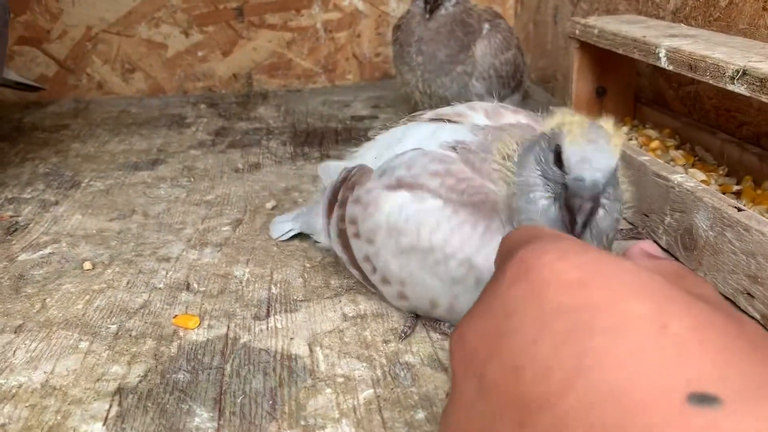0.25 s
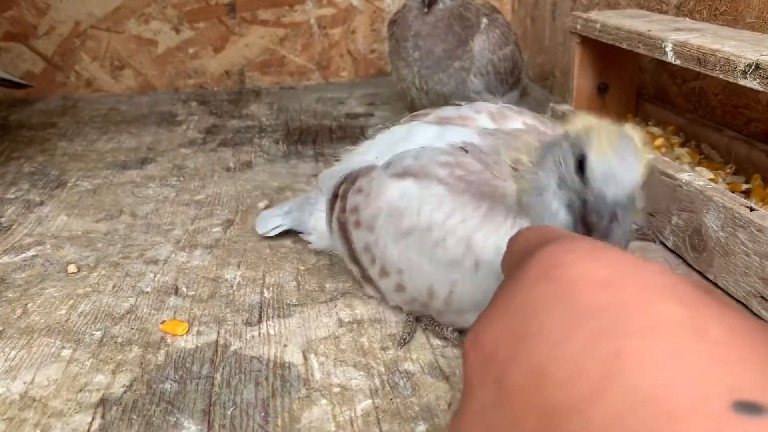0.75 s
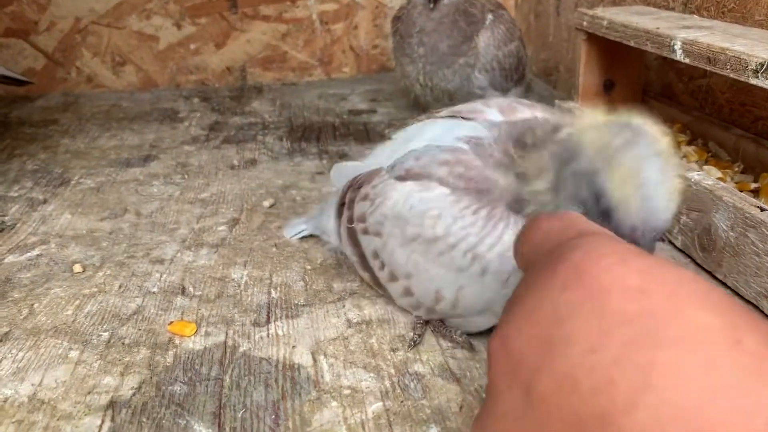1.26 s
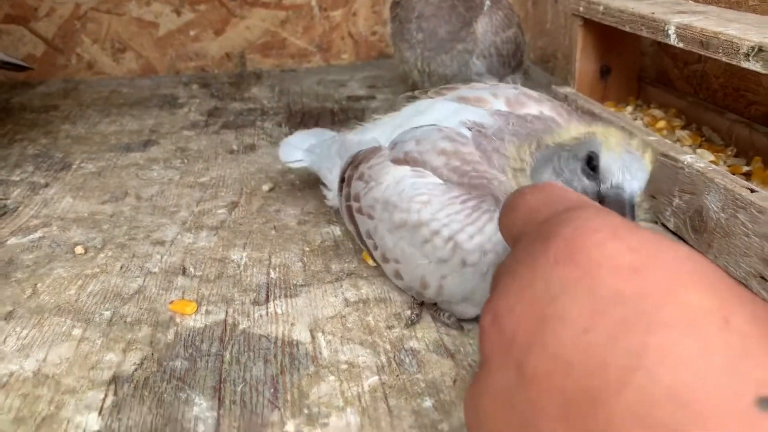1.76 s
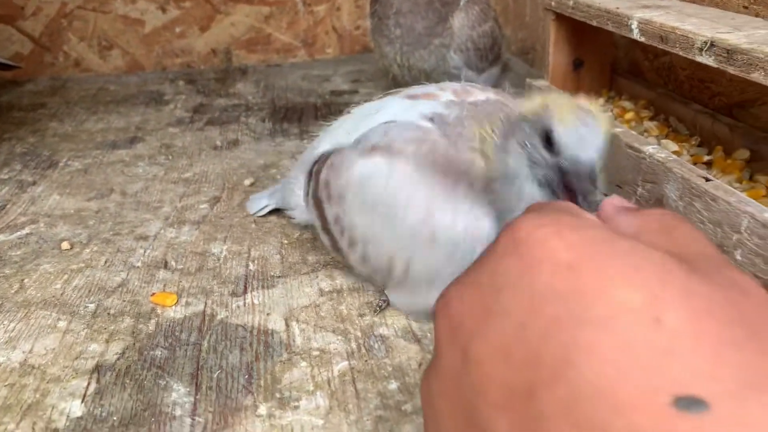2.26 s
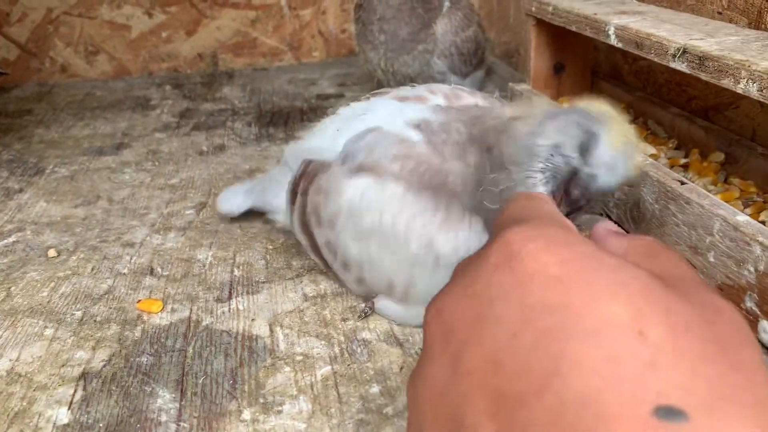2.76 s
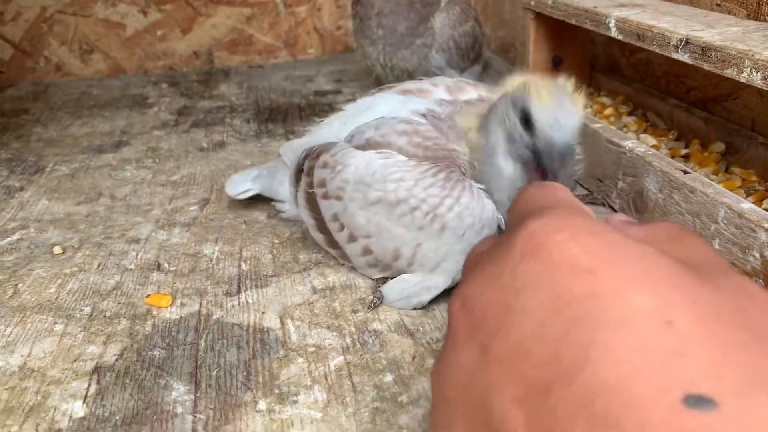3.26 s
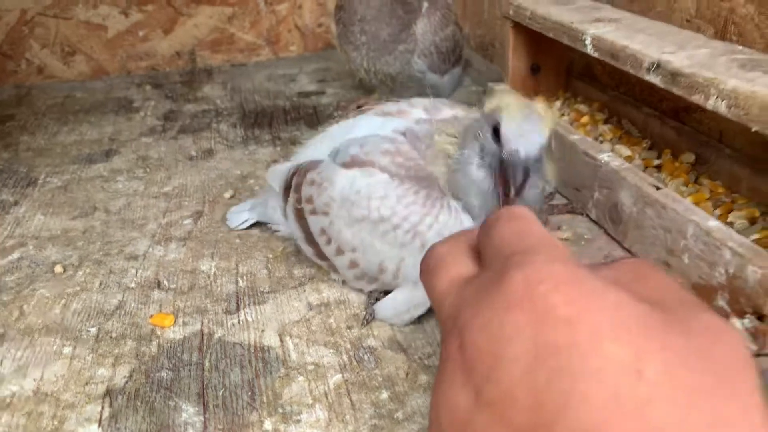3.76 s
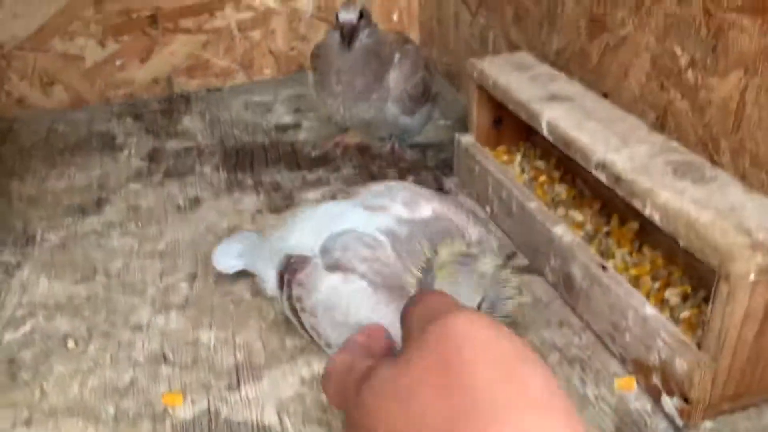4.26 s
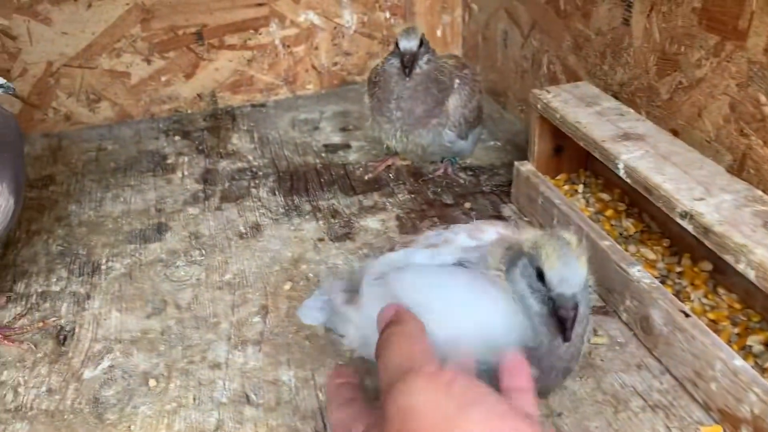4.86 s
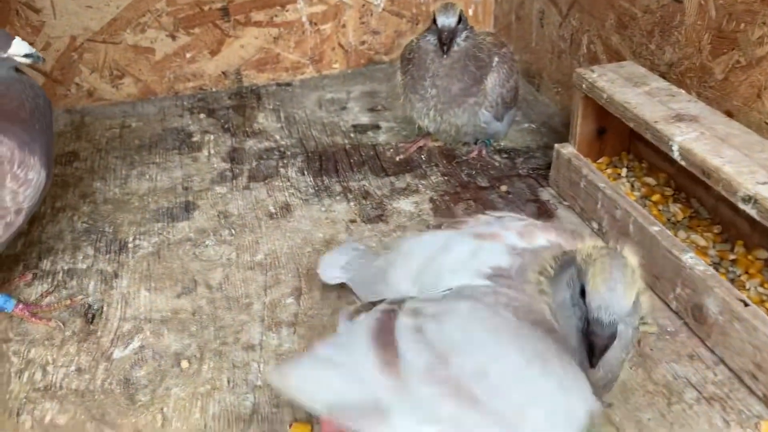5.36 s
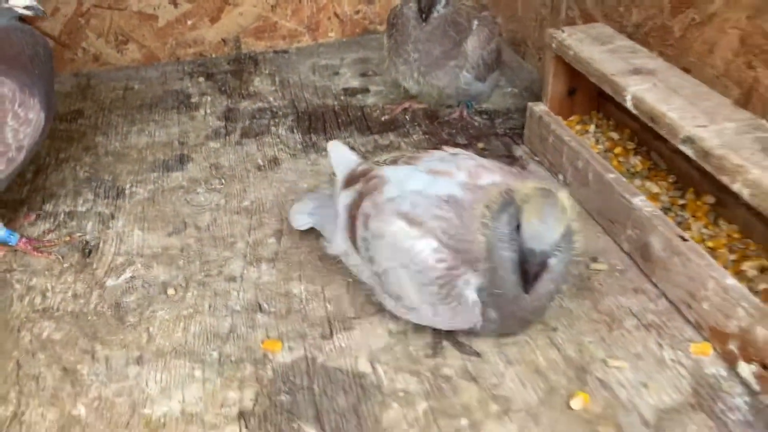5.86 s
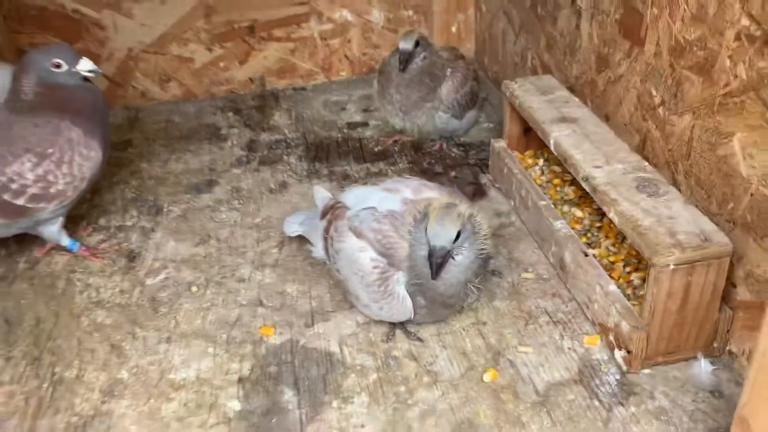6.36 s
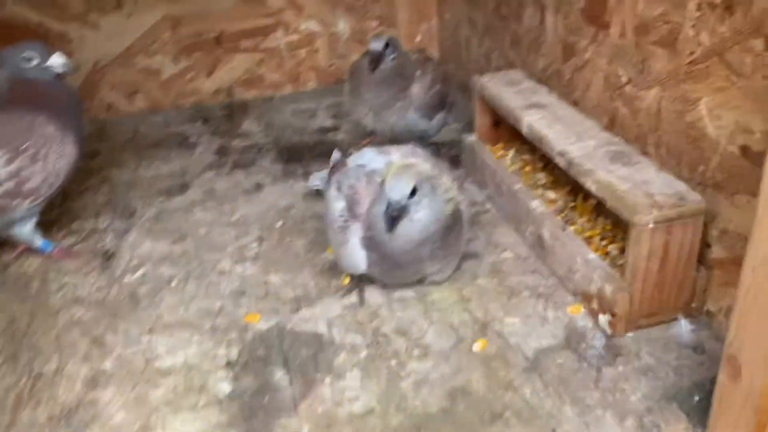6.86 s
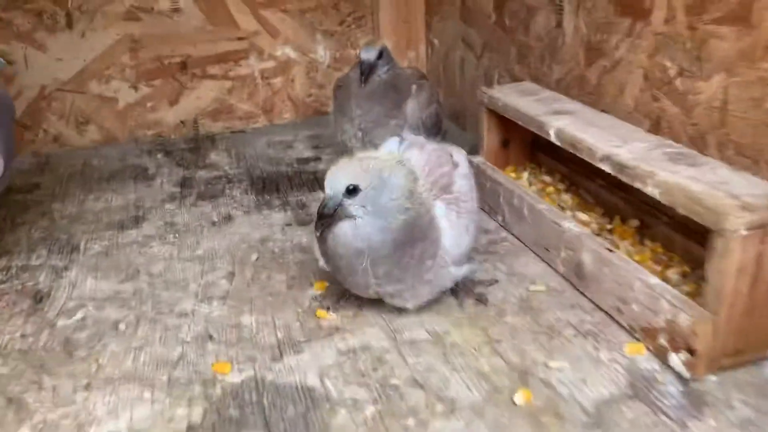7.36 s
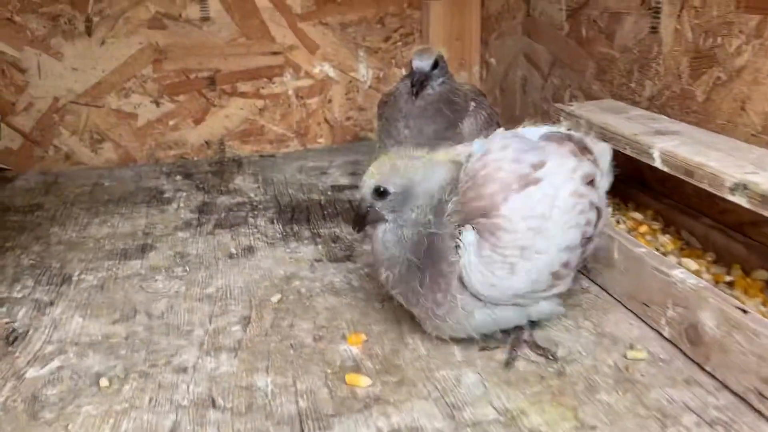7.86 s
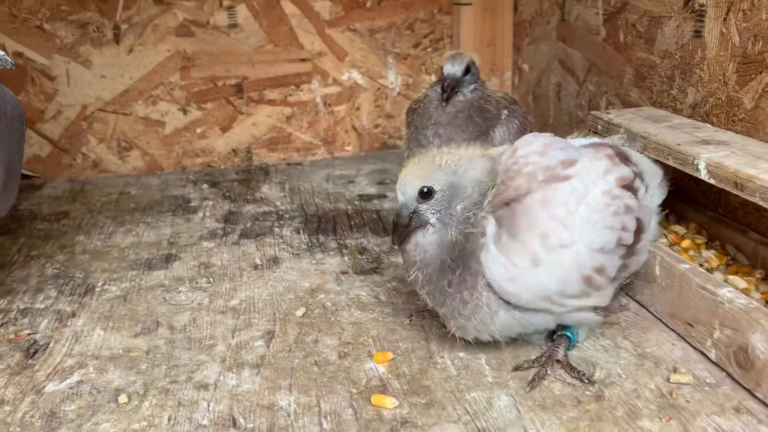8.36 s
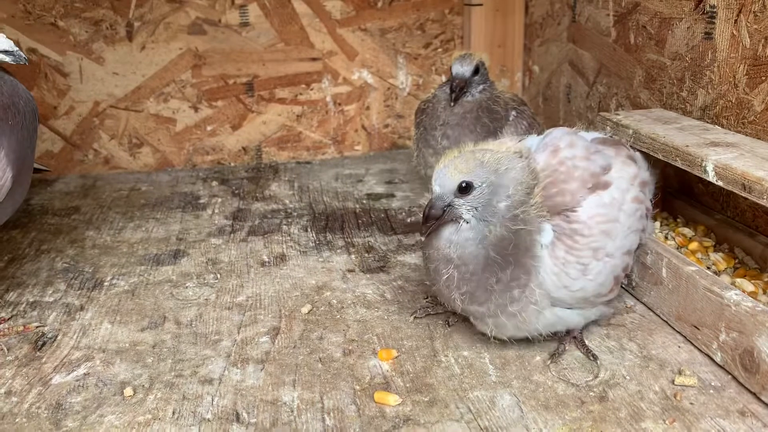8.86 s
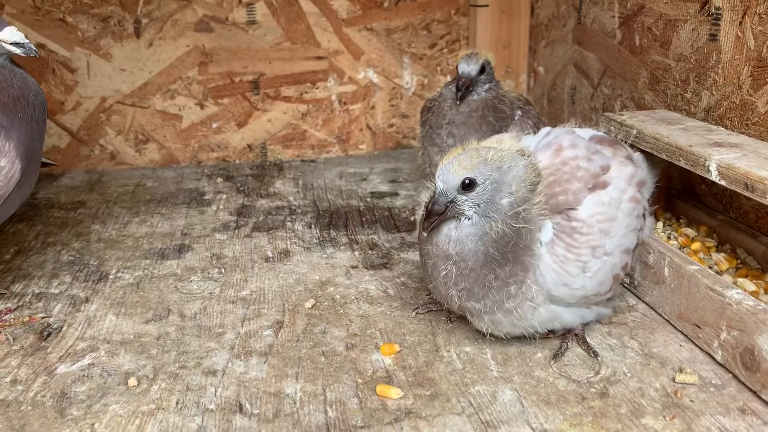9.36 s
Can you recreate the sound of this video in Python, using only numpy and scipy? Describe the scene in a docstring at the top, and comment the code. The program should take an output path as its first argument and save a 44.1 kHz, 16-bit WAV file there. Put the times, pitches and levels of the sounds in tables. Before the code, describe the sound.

A close, stereo scene in a small plywood loft. At 0.1 seconds a dry tap sounds over dull bumping and soft feather rubbing. A short, faint, hoarse squeak comes at 0.4, a stronger one at 0.7 with light foot knocks until 1.1. Low scuffing fills the gap until a weak, pulsing squeak at 2.3, then another at 3.2, with rustles and a thud near 3.6. Two brief squeaks follow around 4, and a louder, rising one from 4.6 to 5.1. At 5.4 a hollow thump and wing rustle meet another squeak. Squeaks continue at 6.3, 7.0, 7.7 and 8.4, clearer and wavering, while steps knock and boom on the boards, notably at 6.8, 7.2 and 7.8. Around 9 seconds a heavy bump and quick steps lead into the longest, rising squeak, ending near 9.8. Tight wooden echoes make the calls flutter.

```python
"""A young pigeon begs in a small plywood loft while a hand strokes it and it shuffles on the floor.
Its syrinx is a double source: two membranes whistle at once, and their nonlinear mixing adds a rasp.
Feet excite decaying floor modes and filtered noise knocks; beak and claws give dry taps of noise.
Rubbing feathers and the bumping body are noise shaped by each stroke of the hand.
Dense echoes, independent at the two ears, make each squeak flutter from side to side."""
import sys
import numpy as np
from scipy import signal
from scipy.fft import rfft, irfft, next_fast_len
from scipy.io import wavfile
from scipy.ndimage import map_coordinates

SR = 44100
rng = np.random.default_rng(int(sys.argv[2]) if len(sys.argv) > 2 else 0)


def inscribe(sig):
    """Save sig as 16-bit PCM at rate SR to the path in sys.argv[1].

    A 1-D sig is mono; a 2-D sig holds one channel per row.
    Samples are clipped to [-1, 1] before scaling.
    """
    pcm = np.round(np.clip(np.atleast_2d(sig).T, -1, 1) * 32767)
    wavfile.write(sys.argv[1], SR, pcm.astype(np.int16))


N = 424683
TIME = np.arange(N) / SR  # seconds

# Strokes of the hand and shifts of the bird, before the layer gains. Each row: strongest moment in seconds,
# length in seconds, body bumping in dB, feather rubbing in dB.
STROKES = [ (0.005, 0.43, -42.5, -57.5), (0.606, 0.13, -67, -55.5), (0.753, 0.18, -38, -64.5),
           (1.097, 0.67, -35.5, -60.5), (2.06, 0.55, -44.5, -71.5), (2.418, 0.28, -42, -56.5),
           (2.85, 0.098, -65, -54.5), (3.139, 0.057, -44, -53), (3.537, 0.03, -47, -45.5),
           (3.013, 0.69, -44, -71.5), (3.356, 0.25, -41.5, -56), (3.591, 0.12, -32, -51.5),
           (3.7, 0.32, -36, -87), (4.228, 0.57, -42, -59), (4.987, 1, -52, -56), (5.396, 0.047, -39, -48),
           (5.596, 0.35, -42, -54), (6.515, 0.63, -40.5, -57), (7.253, 0.038, -35, -36),
           (7.36, 0.86, -39.5, -56.5), (7.971, 0.34, -36.5, -63), (8.713, 0.41, -40.5, -65),
           (8.976, 0.12, -23.5, -80), (9.185, 0.39, -29.5, -63.5)]
STROKE_RISE, STROKE_FALL = 0.4, 0.46  # time constants, as shares of a stroke's length
REST_BODY_DB, REST_FEATHERS_DB = -71, -81.5  # the stir between strokes, before the layer gains
# Spectrum of the body's dull bumps. Each row: frequency in Hz, level in dB.
BODY_SPECTRUM = [(20, -2.5), (55, 9), (110, 9), (170, -6.5), (320, -9), (700, -49), (3000, -85)]
# Spectrum of the body sliding. Each row: frequency in Hz, level in dB.
SCRAPE_SPECTRUM = [(120, -8.5), (220, 5), (550, 1), (1200, -16), (3000, -46)]
# Spectrum of rubbing feathers. Each row: frequency in Hz, level in dB.
FEATHER_SPECTRUM = [(200, -31), (600, -6), (1400, -3), (2600, -8), (7000, -11.5), (15000, -15)]

# Sharp taps of beak or claw. Each row: start in seconds, level in dB midway between the ears.
TAPS = [(0.079, -27), (0.611, -36.5), (1.104, -46.5), (1.213, -50.5), (1.885, -47.5), (2.855, -35.5),
        (6.768, -43.5), (7.531, -40.5), (9.366, -43)]
# Spectrum of a tap. Each row: frequency in Hz, level in dB.
TAP_SPECTRUM = [(100, -21), (600, -20), (1350, 6), (2000, -9.5), (3400, -7.5), (5000, -19.5),
                (15000, -15.5)]

# Feet and wings on the wood, before the layer gains. Each row: start in seconds, knock in dB, floor boom in dB,
# board ring in dB, claw tick in dB, pitch of the struck spot in Hz.
STEPS = [(0.627, -42, -41, -44, -61, 405), (0.68, -46, -39, -42.5, -55, 268),
         (0.743, -45, -46, -46.5, -70, 695), (0.916, -47.5, -39, -41, -75, 280),
         (1.067, -41.5, -31.5, -40, -52, 245), (1.959, -48.5, -63, -48.5, -50, 310),
         (2.342, -37.5, -66, -40.5, -51, 680), (2.989, -44.5, -39.5, -44.5, -54, 168),
         (3.277, -39, -64, -48, -42, 355), (3.377, -39, -48, -39.5, -50, 255),
         (3.575, -34.5, -30, -37, -47.5, 272), (5.362, -48, -48, -43, -41.5, 324),
         (5.421, -29, -20.5, -29.5, -42.5, 303), (5.656, -34.5, -25.5, -41, -49, 310),
         (6.11, -41, -36, -41.5, -43.5, 1010), (6.429, -33.5, -58, -37, -40, 316),
         (6.515, -41, -34, -43, -63, 600), (6.827, -30, -18, -27.5, -35.5, 610),
         (6.925, -32, -31.5, -37, -31, 700), (6.997, -40.5, -62, -43, -38, 190),
         (7.235, -27.5, -20, -31.5, -33, 440), (7.577, -30.5, -25.5, -33, -44, 347),
         (7.793, -28, -22.5, -26.5, -38, 353), (7.962, -39, -68, -38.5, -47.5, 745),
         (8.385, -71, -45, -47, -73, 298), (8.753, -36.5, -31.5, -28, -73, 443),
         (8.891, -32.5, -24, -31, -74, 248), (8.935, -37.5, -27, -39.5, -78, 650),
         (9.087, -29.5, -46, -49, -43, 695), (9.104, -30, -18.5, -21.5, -62, 194)]
# Modes of the floor, before each step's detuning. Each row: frequency in Hz, level in dB, 60 dB decay in seconds.
FLOOR_MODES = [(60.9, -12, 0.48), (115.5, -1.5, 0.15), (191.6, -3, 0.24), (297.5, 0.5, .15), (361, -8, 0.1),
               (565, -5.5, 0.1), (745, -3.5, 0.093), (1062, -7, 0.067), (1296, -3, 0.057),
               (1590, -11, 0.067)]
# Spectrum of the wooden knock. Each row: frequency in Hz, level in dB.
KNOCK_SPECTRUM = [(100, -7), (400, 2.5), (800, 0.5), (1400, -3), (2200, -6), (15000, -42)]
# Spectrum of the claw tick. Each row: frequency in Hz, level in dB.
CLAW_SPECTRUM = [(900, -55), (3200, 8), (15000, -6)]
BOOM_LAG_S = 0.0091  # the bird's weight comes down after its toes
SPOT_DB_PER_OCTAVE = 9  # modes far from the pitch of the struck spot ring less

# Squeaks: pitches and voice levels hold at mid-squeak, before pushes, chance and the mix; climbs and swells
# span the whole squeak. Each row: start in seconds, length in seconds, low voice in Hz, its climb in Hz,
# low voice in dB, its swell in dB, high voice in dB, its swell in dB; then, against the voices, rasp in dB,
# husky side tones in dB, octave of the high voice in dB, octave of the low voice in dB.
SQUEAKS = [ (0.429, 0.12, 3575, -84, -50.5, 1, -62, -7, -11, -7, -8, -12),
           (0.713, 0.28, 3938, -200, -43, -5.5, -51.5, -7.5, -15.5, -26, -5.5, -8),
           (2.258, 0.38, 3532, 24, -51.5, 6, -59, 0, -15.5, -8.5, -18, -15),
           (3.201, 0.36, 3476, -52, -52, -4.5, -61.5, -14, -8.5, -9.5, -4.5, -10),
           (3.948, 0.265, 3472, -66, -50.5, -3, -59, -11, -16, -10.5, -16, -15),
           (4.211, 0.15, 3730, -77, -48.5, -5, -55, -11, -11, -10.5, -10.5, -4.5),
           (4.632, 0.49, 3871, 410.5, -37.5, 9.5, -48.5, 19.5, -21.5, -11, -20, -20),
           (5.35, 0.41, 3858, 155, -42, -5, -46.5, 0, -18, -11, -7, -21.5),
           (6.318, 0.371, 3812, -130, -44.5, 10, -54.5, -14, -31, -9, -6, -19),
           (6.988, 0.47, 4325, 3, -45.5, 2.5, -54.5, 12, -22, -7.5, -8, -27),
           (7.678, 0.47, 3981, 331, -41.5, -3, -42.5, 8, -39, -8.5, -8.5, -22.5),
           (8.387, 0.48, 3873, 353, -39, 3.5, -45.5, 11.5, -37.5, -12.5, -9, -27.5),
           (9.14, 0.65, 3837, 404.5, -39, -3.5, -40.5, 15, -37, -10.5, -16, -26.5)]
# Pushes of air within a squeak, and catches where the pitch drops. Each row: middle in seconds,
# length in seconds, change of the low voice in Hz, of the low voice in dB, of the high voice in dB.
PUSHES = [ (0.425, 0.051, 187, 8, 3), (0.732, 0.073, -450, -14.5, -34), (0.798, 0.062, 113, -7, 8),
          (0.919, 0.022, 266, 11, 4), (0.96, 0.039, -100, 7.5, 15), (2.349, 0.066, 287, 13.5, 18),
          (2.423, 0.07, 387.5, 22.5, 15), (2.564, 0.073, 162, 5.5, 12), (3.391, 0.058, 381, 11, 17),
          (3.472, 0.12, 423.5, 15, 18), (4.002, 0.082, 358, 11, 11), (4.157, 0.077, 320, 10, 2),
          (4.271, 0.071, 152, 2, 10), (4.744, 0.03, 173, 3, 7), (4.773, 0.038, -300, -5, -7),
          (4.819, 0.058, 140, 4, 4), (4.961, 0.064, 110, 2, 1), (5.398, 0.1, -200, -11.5, -24),
          (5.519, 0.14, 95.5, 7, -2), (5.596, 0.037, 152, -1, 12.5), (5.682, 0.051, 279, -7, 8.5),
          (6.43, 0.087, 62, -17, 3), (6.993, 0.11, 150, 7, 1), (7.39, 0.17, 419.5, -0.5, 9),
          (7.461, 0.04, -500, 24, 9), (7.836, 0.042, -250, 0, -10), (8.1, 0.083, 77, -26, 5.5),
          (8.141, 0.036, -350, 0, -6), (8.522, 0.051, -180, 0.5, 7), (8.673, 0.071, 157, 2, 5.5),
          (8.859, 0.044, -260, 4, -9), (9.215, 0.039, -200, -2.5, -15), (9.295, 0.046, -170, 0.5, 1)]
# Pitch of the high voice, which warbles on its own, before droop and quaver. Each row: time in seconds,
# frequency in Hz.
HIGH_VOICE = [(0.78, 5350), (0.96, 5020), (2.3, 5244), (2.43, 5470), (2.51, 5065), (3.33, 5207),
              (3.98, 5340), (4.08, 5138), (5.07, 5170), (5.53, 5010), (5.595, 5210), (5.65, 4890),
              (5.69, 5360), (5.727, 4990), (6.378, 5240), (6.5, 5014), (7.12, 5100), (7.25, 4820),
              (7.399, 5305), (7.43, 5120), (7.7, 5064), (7.77, 4860), (7.854, 5045), (7.914, 4920),
              (7.974, 5140), (8.01, 4920), (8.06, 5100), (8.08, 5340), (8.115, 5305), (8.145, 4340),
              (8.41, 5140), (8.608, 4890), (8.668, 5147), (8.7, 4953), (9.243, 5037), (9.279, 4850),
              (9.37, 4930), (9.5, 4865)]
ATTACK_S, RELEASE_S, FADE_DB = 0.015, 0.013, 10  # the air pressure builds and gives out
DROOP_HZ = 120  # both voices sink as it gives out
# Mean distance of the side tones: above the low voice, and to either side of the high one.
LOW_FLUTTER_HZ, HIGH_FLUTTER_HZ = 732, 410
# The bird turns and walks across. Each row: time in seconds, lag of the right ear in milliseconds.
BEARING = [(6.5, .06), (7.3, .17), (7.9, .143), (9.4, .125)]

# Treble tone curve: thinner near 6.5 kHz, very weak near 11.5 kHz. Each row: frequency in Hz, gain in dB.
TREBLE_CURVE = [(5400, 0), (6500, -5), (8000, -1.5), (10500, -0.5), (11450, -18.5), (12500, 1),
                (14000, -4.5), (15500, -7)]
TOP_HZ = 15400  # upper band limit


def undb(db):
    """Logarithmic scale: decibels to amplitude gain."""
    return 10 ** (np.asarray(db) / 20)


def unit(x):
    """Normalisation by mean power: scale to rms 1."""
    return x / np.sqrt(np.mean(x ** 2))


def curves(rows, t):
    """Linear interpolation: join each column of a table by straight lines in time."""
    s, *columns = np.transpose(rows)
    return [np.interp(t, s, column) for column in columns]


def tint(x, points):
    """Linear filtering in the frequency domain: multiply the spectrum by a curve of (Hz, dB) points."""
    hz, db = np.transpose(points)
    n = next_fast_len(x.shape[-1])
    f = np.maximum(np.arange(n // 2 + 1) * SR / n, 1)
    gain = undb(np.interp(np.log(f), np.log(hz), db))
    return irfft(rfft(x, n) * gain, n)[..., :x.shape[-1]]


def colour(x, points):
    """Spectral shaping: filter x by (Hz, dB) points and bring it to rms 1."""
    return unit(tint(x, points))


def walk(n, rate):
    """Band-limited chance: random values of spread near 1, `rate` per second, joined smoothly."""
    place = np.arange(n) * rate / SR
    return map_coordinates(rng.standard_normal(n // 10 + 10), [place], order=2, mode="mirror")


def air(n, apart_hz=1100):
    """Interaural coherence: noise alike at both ears in the bass and unrelated in the treble."""
    mid, side = rng.standard_normal((2, n))
    side = signal.sosfilt(signal.butter(1, apart_hz, "high", fs=SR, output="sos"), side)
    return np.array([mid + side, mid - side])


def fade(t, t60):
    """Exponential damping: free decay by 60 dB in t60 seconds."""
    return np.exp(-np.log(1000) * t / t60)


def add(out, s, x):
    """Superposition: mix x into out from time s."""
    i = max(int(s * SR), 0)
    out[:, i:i + x.shape[1]] += x[:, :N - i]


def stroking():
    """Addition of powers: each stroke swells and dies away exponentially; returns body and feathers in dB."""
    body_power, feather_power = undb(REST_BODY_DB) ** 2, undb(REST_FEATHERS_DB) ** 2
    for s, length, body_db, feather_db in STROKES:
        along = (TIME - s) / length
        decay = np.maximum(-along / STROKE_RISE, along / STROKE_FALL)
        force = np.exp(-np.minimum(decay, 20))
        body_power = body_power + (undb(body_db) * force) ** 2
        feather_power = feather_power + (undb(feather_db) * force) ** 2
    return 10 * np.log10(body_power), 10 * np.log10(feather_power)


def scuffle():
    """Friction noise: the body bumps dully and scrapes in lumps; feather barbs catch and slip in small grains."""
    body_gain_db, feather_gain_db, scrape_gain_db = -1.5, 2.5, -9
    scrape_share = 0.33  # how far the scrape's level follows the feathers rather than the body
    lumps_db, bumps_db = 4, 1.5  # spread of the unevenness
    body_db, feather_db = stroking()

    bumps = undb(bumps_db * walk(N, 70))
    body = colour(air(N) * bumps, BODY_SPECTRUM) * undb(body_db + body_gain_db)

    slide_db = body_db + scrape_share * (feather_db - body_db)
    lumps = undb(lumps_db * walk(N, 28))
    scrapes = colour(air(N) * lumps, SCRAPE_SPECTRUM) * undb(slide_db + scrape_gain_db)

    grains = undb(2.73 * np.minimum(rng.exponential(size=N), 6))
    rubbing = colour(air(N) * grains, FEATHER_SPECTRUM)
    feathers = rubbing * undb(feather_db + feather_gain_db + 3 * walk(N, 35))
    return body + scrapes + feathers


def loft(x, wet_db=-0.5, t60=0.062):
    """Reverberation: close plywood walls return a short, dense spray of echoes, different at each ear."""
    t = TIME[:SR // 4]
    echoes = rng.standard_normal((2, len(t))) * fade(t, t60) * (t > .001)
    echoes /= np.sqrt(np.sum(echoes ** 2, axis=1, keepdims=True))  # unit energy
    return x + undb(wet_db) * signal.fftconvolve(x, echoes, axes=1)[:, :N]


def tap(db, t60=.028, tail_db=-19, left_db=2.5):
    """Impact of a hard point on wood: a dry click with a weak slower tail, a little to the left."""
    t = TIME[:SR // 4]
    ear_gain = undb(db + np.array([[left_db], [-left_db]]))
    decay = fade(t, t60) + undb(tail_db) * fade(t, 0.15)
    return ear_gain * colour(air(len(t)), TAP_SPECTRUM) * decay


def step(knock_db, boom_db, ring_db, claw_db, spot_hz):
    """Modal excitation: the claw ticks, the wood knocks and rings, and the floor swings up a little later."""
    knock_gain_db, claw_gain_db, boom_gain_db, ring_gain_db = -7, 5, 6, 6
    tail_db, dull_hz = -9, 1200
    t = TIME[:SR // 2]
    grit = undb(3.5 * walk(len(t), 400))
    press = 1 - np.exp(-t / .002)  # the foot's pressure builds up
    wood = colour(air(len(t)), KNOCK_SPECTRUM) * grit * press
    # the bright part of the knock dies sooner, the dull part lingers in the boards
    dull = signal.sosfilt(signal.butter(2, dull_hz, fs=SR, output="sos"), wood)
    knock = wood * fade(t, 0.14) + undb(tail_db) * dull * fade(t, 0.29)
    claw = colour(air(len(t)), CLAW_SPECTRUM) * grit * press * fade(t, .07)

    floor = 0
    for hz, db, t60 in FLOOR_MODES:
        if hz < 150:  # the boom
            age = np.maximum(t - BOOM_LAG_S, 0)
            size_db = boom_db + boom_gain_db
        else:  # the ring of the boards
            age = t
            size_db = ring_db + ring_gain_db - SPOT_DB_PER_OCTAVE * abs(np.log2(hz / spot_hz))
        swell = 1 - np.exp(-(age * hz) ** 2)  # a soft foot takes about a cycle to move each mode
        # every step rings the floor a little differently
        detune = 1 + .035 * rng.standard_normal()
        tone = np.sin(2 * np.pi * (hz * detune * age + rng.random()))
        floor = floor + undb(db + size_db) * swell * fade(age, t60) * tone
    return undb(knock_db + knock_gain_db) * knock + undb(claw_db + claw_gain_db) * claw + floor


def airflow(t, length, low_hz, climb_hz, low_db, low_swell_db, high_db, high_swell_db):
    """Pressure control of the voices: pushes bend pitch and level, and both voices droop as the air gives out."""
    age = t - t[0]
    along = age / length - .5
    building, failing = np.exp(-age / ATTACK_S), np.exp((age - length) / RELEASE_S)
    push_hz, push_low_db, push_high_db = sum(
        np.outer(sizes, np.cos(np.pi * np.clip((t - s) / span, -.5, .5))) for s, span, *sizes in PUSHES)
    high_hz, = curves(HIGH_VOICE, t)
    slack_db = FADE_DB * (building + failing)
    return (low_hz + climb_hz * along + push_hz - DROOP_HZ * failing,
            high_hz - DROOP_HZ * failing,
            low_db + low_swell_db * along + push_low_db - slack_db,
            high_db + high_swell_db * along + push_high_db - slack_db)


def whistle(hz, waver, rough):
    """Phase as the integral of frequency: a membrane's pitch quavers slowly and trembles fast."""
    n = len(hz)
    quaver = 1 + waver * walk(n, 75) + rough * walk(n, 700)
    return 2 * np.pi * np.cumsum(hz * quaver) / SR


def partial(phase, ragged=0.32):
    """Amplitude modulation: an upper partial whose strength flutters raggedly."""
    return np.sin(phase) * (1 + ragged * walk(len(phase), 600)) / np.hypot(1, ragged)


def side_tones(low, high, low_size, high_size, effort):
    """Sidebands: each membrane flutters and throws a tone between the voices; the high one adds a weak tone above."""
    n = len(low)
    outer_db = -17
    sides = 0
    for phase, size, flutter_hz, db in ((low, low_size, LOW_FLUTTER_HZ, 0),
                                        (high, high_size, -HIGH_FLUTTER_HZ, 0),
                                        (high, high_size, HIGH_FLUTTER_HZ, outer_db)):
        flutter = whistle(np.full(n, flutter_hz), .07, .03)
        strength = np.sqrt(2 * size / effort) * undb(db + 3.5 * walk(n, 25))  # they come and go
        sides = sides + strength * np.exp(1j * (phase + flutter))
    return sides


def squeak(start, length, voices, rasp_db, husk_db, high_octave_db, low_octave_db):
    """Double source with nonlinear mixing: two voices, their overtones, side tones and the sum tones of them all."""
    third_db, fourth_db = -12, -10  # upper overtones against the octave of their voice
    trade_db, low_fray, high_fray = 2.5, 0.2, .9
    sum_db, sum_share, triple_db, triple_share, wheeze_db = -10, 0.54, -9, 1.0, -12
    t = start + TIME[:int(length * SR)]
    n = len(t)
    low_hz, high_hz, low_db, high_db = airflow(t, length, *voices)
    # the air favours now one membrane, now the other, and both throb unevenly
    favour_db = trade_db * walk(n, 31.1)
    low_size = undb(low_db + favour_db / 2 + 2.2 * walk(n, 140))
    high_size = undb(high_db - favour_db + 2.2 * walk(n, 140))
    low, high = whistle(low_hz, .007, .004), whistle(high_hz, .005, .003)
    # both voices fray as the squeak goes on, the high one most when the bird is hoarse
    spent = (t - start) / length
    low = low + low_fray * spent * walk(n, 400)
    high = high + high_fray * undb(rasp_db / 2) * spent * walk(n, 600)

    low_overtones = partial(2 * low) + undb(fourth_db) * partial(4 * low)
    high_overtones = partial(2 * high) + undb(third_db) * partial(3 * high)
    clean = low_size * (np.sin(low) + undb(low_octave_db) * low_overtones)
    clean += high_size * (np.sin(high) + undb(high_octave_db) * high_overtones)

    effort = np.hypot(low_size, high_size)
    sides = side_tones(low, high, low_size, high_size, effort)
    # the rough parts hold on more evenly than the clean voices
    push = effort * (np.median(effort) / effort) ** .25
    # the membranes slap together and mix all tones in twos and threes; the hoarser, the brighter
    blend = (np.exp(1j * low) + np.exp(1j * high) + sides) / 2
    rasp = undb(sum_db + sum_share * rasp_db) * blend ** 2
    rasp = rasp + undb(triple_db + triple_share * rasp_db) * blend ** 3
    wheeze = undb(wheeze_db + rasp_db) * blend * walk(n, 1500)
    rough = push * np.imag(undb(husk_db) * sides / 2 + rasp + wheeze)
    call = np.sqrt(2) * (clean + rough)
    call *= np.clip(np.minimum(t - t[0], t[-1] - t) / .01, 0, 1)  # 10 ms ramps at both ends
    lag_ms, = curves(BEARING, t)
    right = map_coordinates(call, [np.arange(n) - lag_ms * SR / 1000], order=3)
    return np.array([call, right])


def scene(voice_db=-1):
    """Superposition of sources: squeaks in the loft, steps and taps on its floor, the scuffle beneath them."""
    voice, wood = np.zeros((2, 2, N))
    for s, length, *voices, rasp_db, husk_db, high_octave_db, low_octave_db in SQUEAKS:
        add(voice, s, squeak(s, length, voices, rasp_db, husk_db, high_octave_db, low_octave_db))
    for s, *levels in STEPS:
        add(wood, s, step(*levels))
    for s, db in TAPS:
        add(wood, s, tap(db))
    ear_db = np.array([[.5], [-.5]])  # the voice is a little stronger at the left
    return loft(voice) * undb(voice_db + ear_db) + wood + scuffle()


def record(dry):
    """Tone shaping by linear filters: the treble is coloured and the top is cut."""
    low_pass = signal.ellip(8, .2, 70, TOP_HZ, fs=SR, output="sos")
    return signal.sosfilt(low_pass, tint(dry, TREBLE_CURVE))


dry = scene()
out = record(dry)
inscribe(out)
```